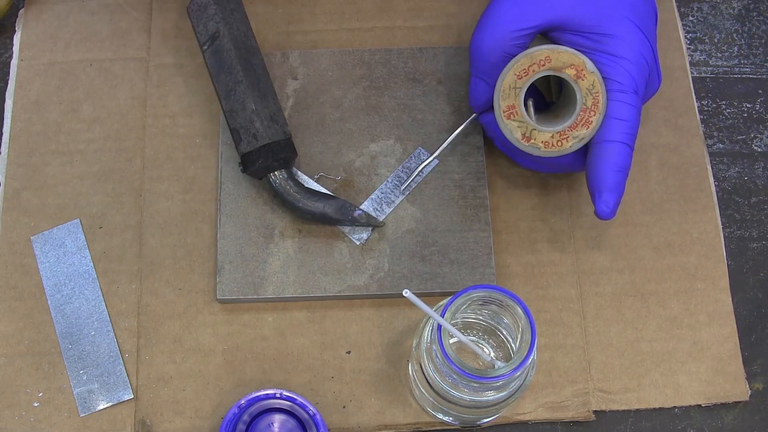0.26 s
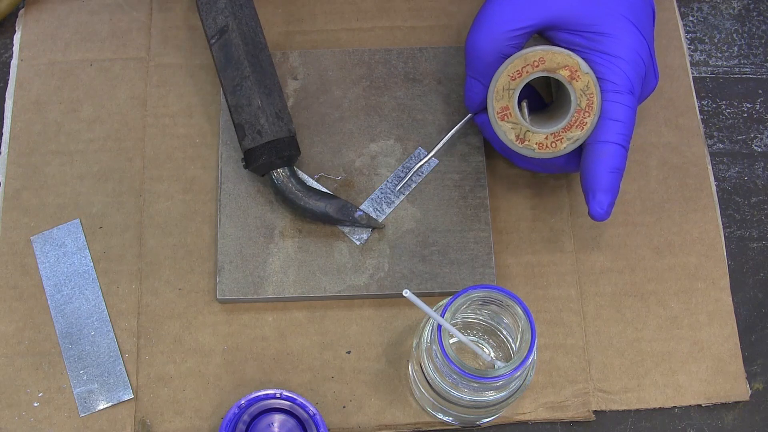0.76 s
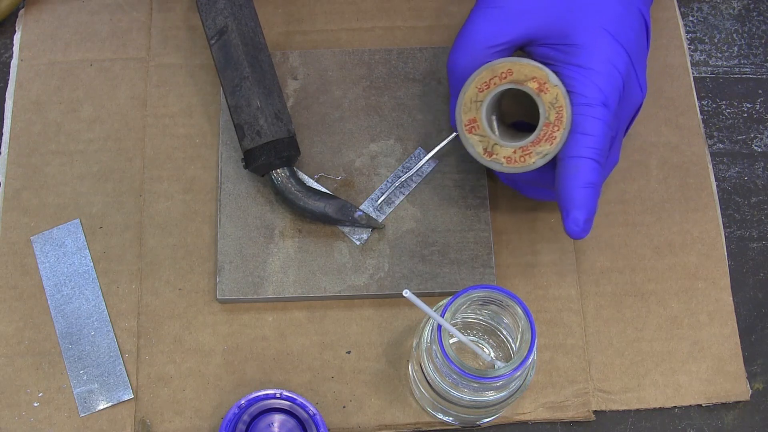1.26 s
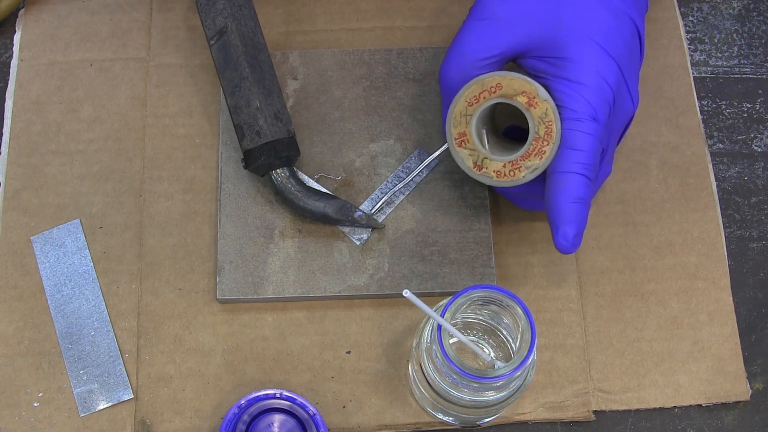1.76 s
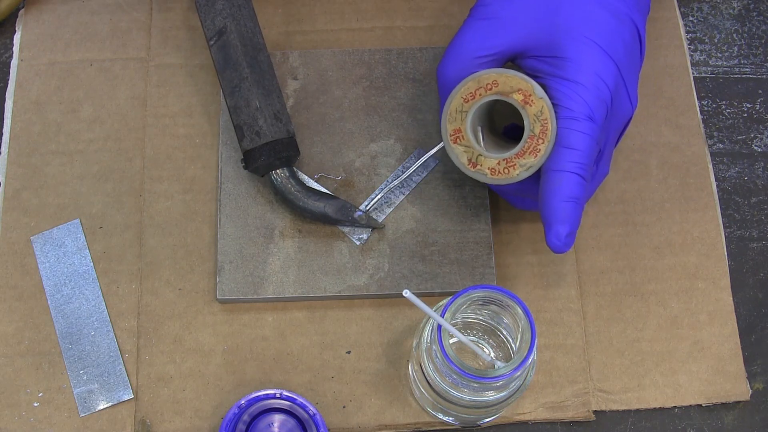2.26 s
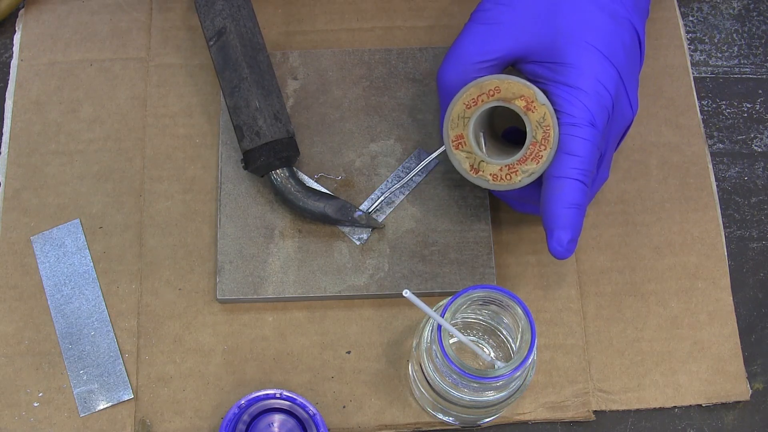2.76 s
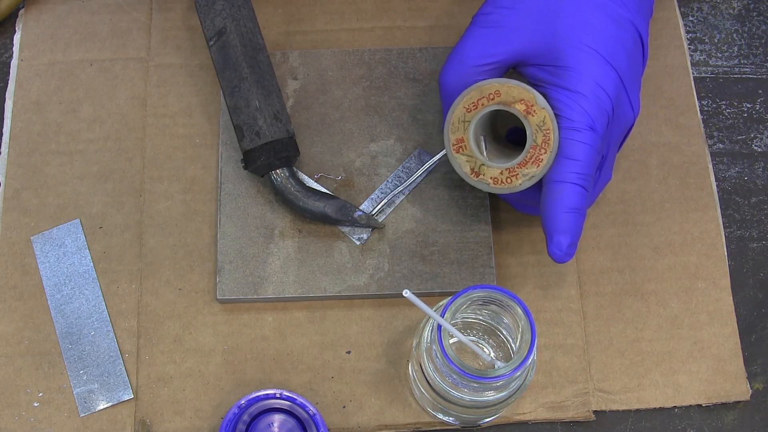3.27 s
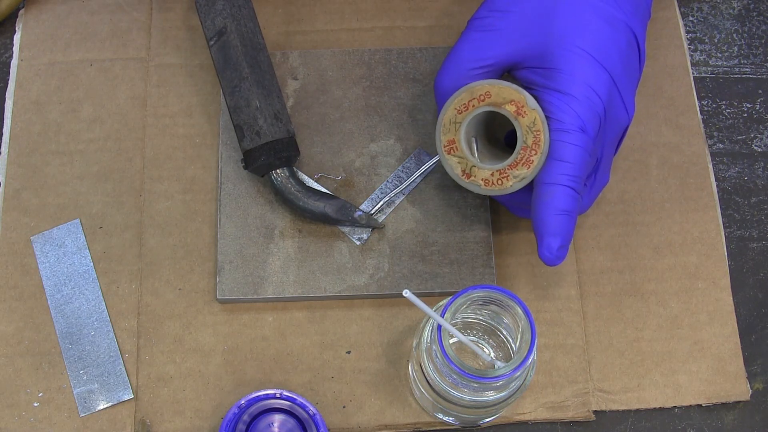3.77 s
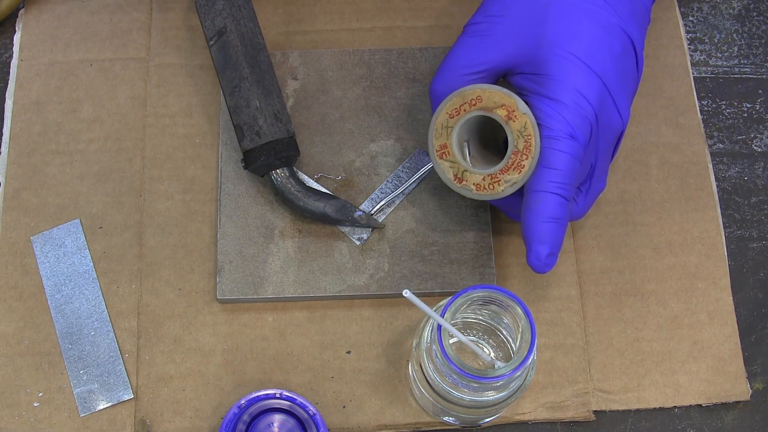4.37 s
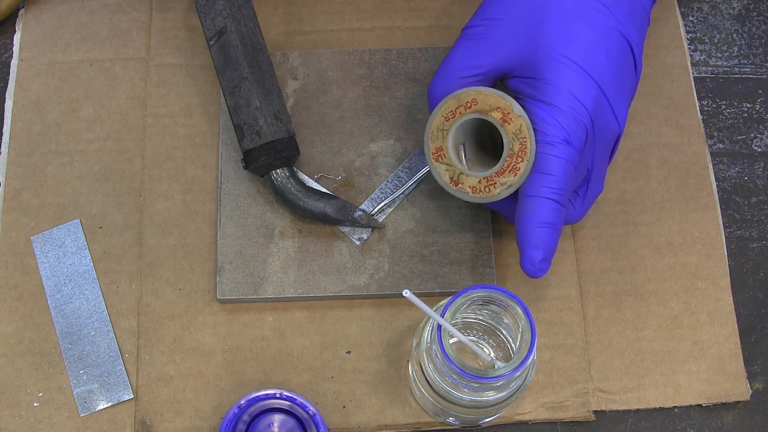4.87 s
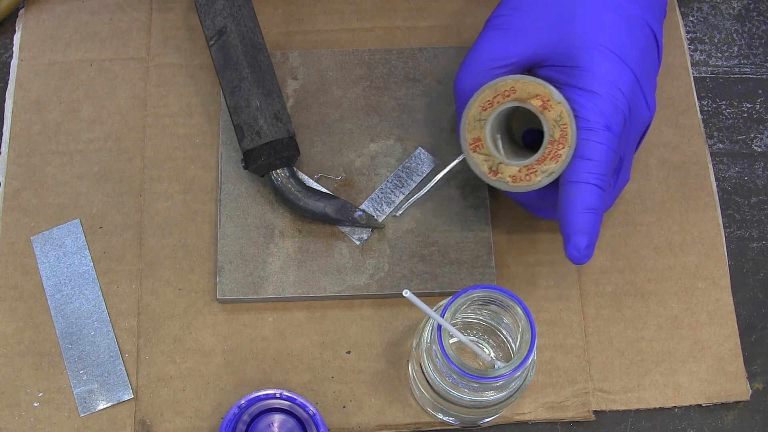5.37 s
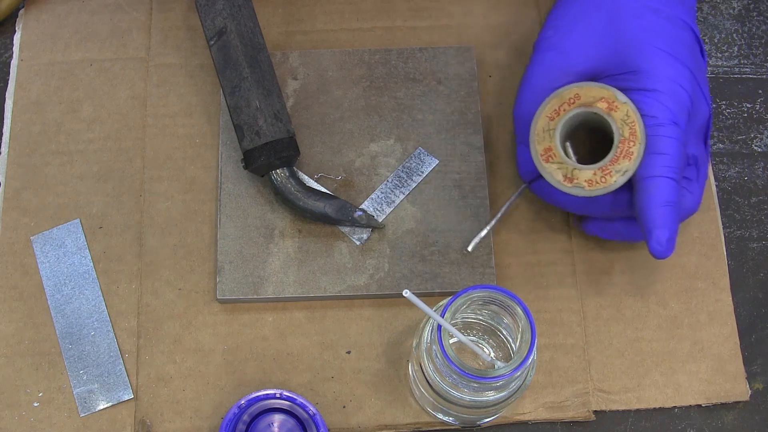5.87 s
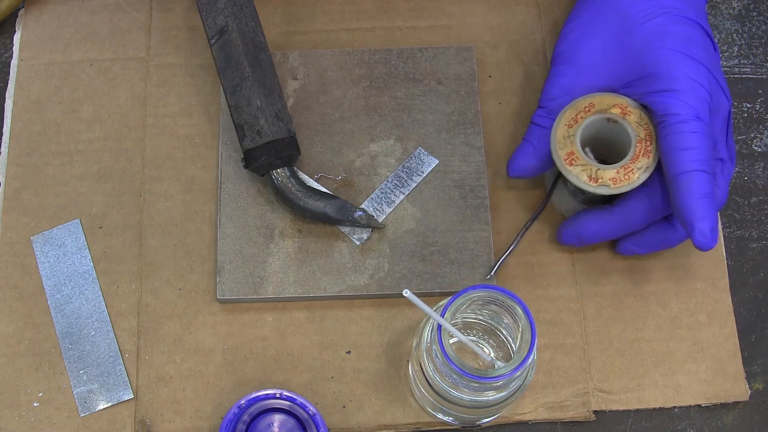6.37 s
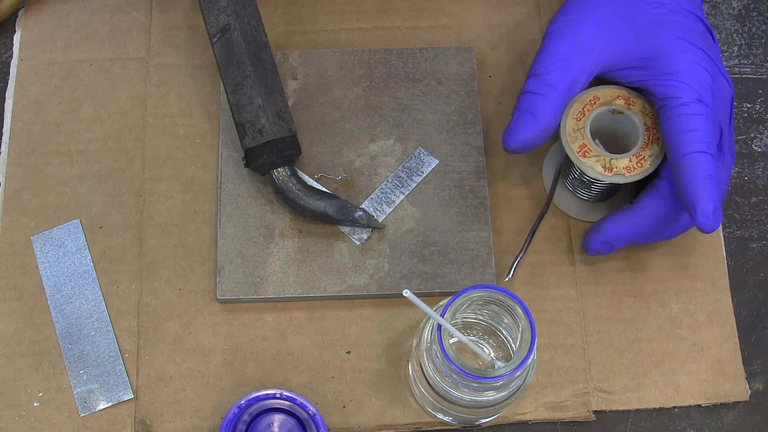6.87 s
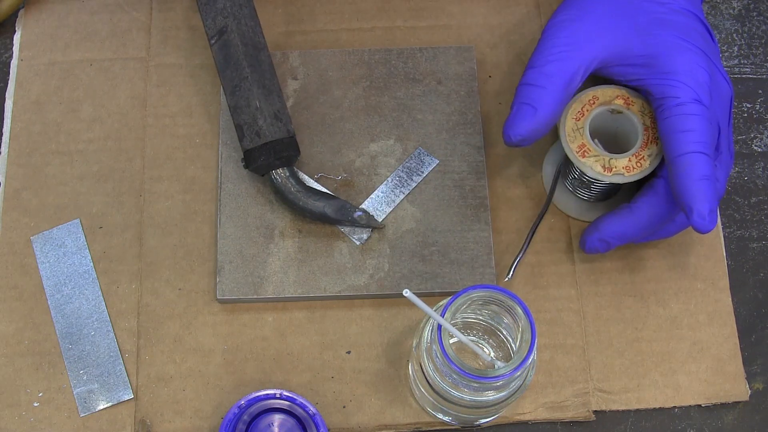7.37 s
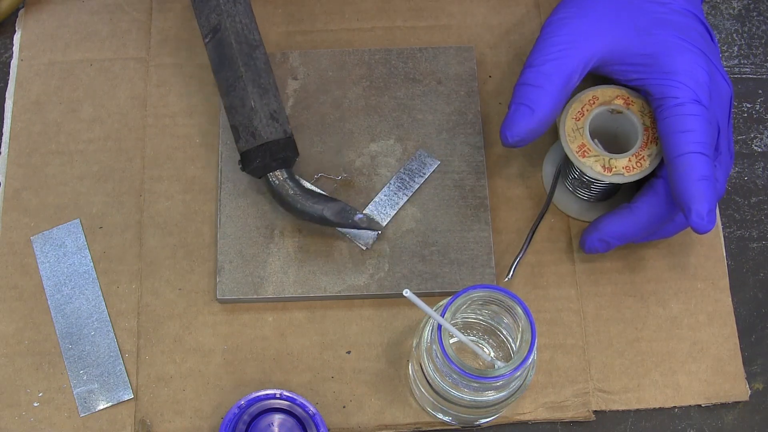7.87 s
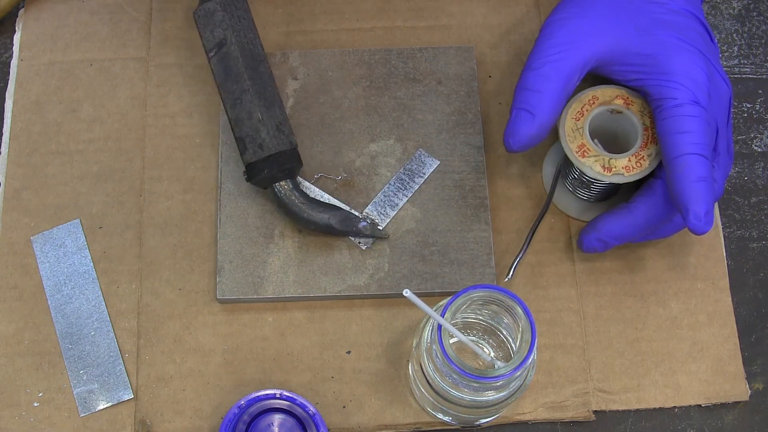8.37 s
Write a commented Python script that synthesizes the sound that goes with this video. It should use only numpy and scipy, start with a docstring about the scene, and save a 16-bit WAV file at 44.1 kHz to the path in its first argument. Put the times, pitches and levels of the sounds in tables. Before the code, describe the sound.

A hot soldering iron boils flux on a strip of sheet metal, making a fine, fluttering sizzle close to the microphone. It grows more crackly, with spits and hissing flares, while a gloved hand puts a spool aside with light taps and faint rubbery squeaks. The sizzle dies, the iron scrapes and clinks briefly, and a last drop bursts with a sharp pop. Faint ventilation runs throughout in the workshop.

```python
"""A fine, fluttering sizzle: a hot soldering iron boils acid flux on a strip of sheet metal, and thousands
of tiny steam bubbles burst, with flares and spits where fresh flux meets the tip. A gloved hand puts the
solder spool aside with light taps, rubs and squeaks. The film dries and the sizzle dies; the iron scrapes
and clinks as it is shifted. A last wet spot flashes off with a pop that the workshop's walls answer,
over steady ventilation."""
import sys
import numpy as np
from scipy import signal
from scipy.fft import rfft, irfft, next_fast_len
from scipy.io import wavfile
from scipy.ndimage import map_coordinates

SR = 44100
rng = np.random.default_rng(int(sys.argv[2]) if len(sys.argv) > 2 else 0)


def to_wav(sig):
    """Store sig (one row per channel, or 1-D mono) as 16-bit WAV at the path in sys.argv[1].

    Samples outside -1..1 are clipped; the rate is SR.
    """
    pcm = np.clip(np.atleast_2d(sig), -1, 1) * 32767
    pcm = np.round(pcm).astype(np.int16)
    wavfile.write(sys.argv[1], SR, pcm.T)  # frames by channels


N = 379701
DRY_S, POP_S = 7.34, 8.408  # film used up; trapped drop bursts


def amp(db):
    return 10 ** (np.asarray(db) / 20)


def unit_rms(x):
    return x / np.sqrt(np.mean(x ** 2) + 1e-20)


def along(points, hz):
    """Interpolate (f/Hz, value) points on a log axis."""
    freqs, values = np.transpose(points)
    return np.interp(np.log(hz + 1), np.log(freqs + 1), values)


def clock():
    return np.arange(N) / SR


def swell(crest_s, half_s):
    """Bell-shaped envelope."""
    return np.exp(-((clock() - crest_s) / half_s) ** 2)


def wobble(knots_per_s):
    """Smooth random curve."""
    knots = rng.standard_normal(int(N * knots_per_s / SR) + 4)
    return map_coordinates(knots, [clock() * knots_per_s])


def filtered(x, gain_at_hz):
    """Zero-phase filter."""
    size = next_fast_len(N + SR // 2)
    return irfft(rfft(x, size) * gain_at_hz(np.fft.rfftfreq(size, 1 / SR)), size)[..., :N]


def snap(spectrum, size=2048):
    """Minimum-phase pulse with this spectrum, energy 1."""
    cepstrum = irfft(np.log(amp(along(spectrum, np.fft.rfftfreq(size, 1 / SR)))))
    cepstrum[1:size // 2] *= 2
    cepstrum[size // 2 + 1:] = 0
    pulse = irfft(np.exp(rfft(cepstrum)))
    return pulse / np.linalg.norm(pulse)


def through(x, pulse):
    return signal.fftconvolve(x, pulse)[:N]


def add(track, start_s, sound):
    rest = track[round(start_s * SR):]
    rest[:len(sound)] += sound[:len(rest)]


def impulses(per_s, spread_db):
    """Random impulses of uneven size, rms 1."""
    happens = rng.random(N) < per_s / SR
    sizes = amp(spread_db * np.clip(rng.standard_normal(N), -2, 2))
    return unit_rms(happens * sizes * rng.choice([-1, 1], N))


def bubbles(spectrum, per_s, spread_db, ring_db, bands=7):
    """Bursting bubbles: bare snaps, plus as many that ring briefly at a pitch set by their size."""
    ringing = np.zeros(N)
    for hz in np.geomspace(3000, 13000, bands):
        resonance = signal.iirpeak(hz, Q=2, fs=SR)
        ringing += signal.lfilter(*resonance, impulses(per_s / bands, spread_db)) / np.sqrt(hz)
    bursts = impulses(per_s, spread_db) + amp(ring_db) * unit_rms(ringing)
    return unit_rms(through(bursts, snap(spectrum)))


AIR_SPECTRUM = [(55, -10), (95, -6), (150, -0.5), (300, -0.5), (400, -1), (490, -0.5), (600, -1.5),
                (800, -0.5), (1200, -5.5), (2200, -8.5), (3800, -10.5), (7000, -17.5), (10000, -19),
                (15800, -26.5)]  # room air: f/Hz, level/dB
AIR_COHERENCE = [(30, 1), (90, 0.23), (250, 0.017), (700, 0.04), (2000, 0.47), (6000, 0.98)]  # f/Hz, left-right correlation

def ventilation():
    """Steady stereo noise of moving air."""
    def mid_side_gains(hz):
        angle = np.arccos(np.clip(along(AIR_COHERENCE, hz), -1, 1)) / 2
        return amp(along(AIR_SPECTRUM, hz)) * [np.cos(angle), np.sin(angle)]
    mid, side = filtered(rng.standard_normal((2, N)), mid_side_gains)
    return amp(-61) * unit_rms(np.array([mid + side, mid - side]))


ROOM_DECAY = [(150, 0.57), (1000, 0.34), (4000, 0.35), (12000, 0.24)]  # reverberation: f/Hz, t60/s
ROOM_WIDTH = [(150, 0.33), (400, 0.23), (1000, 0.27), (3000, 0.02), (8000, 0.02)]  # f/Hz, side-to-mid ratio

def workshop(x):
    """Wall reverberation: the bass lasts longest and spreads widest."""
    hz, t, noise = signal.stft(rng.standard_normal((2, SR // 2)), SR, nperseg=256)
    decay = amp(-60 * t / along(ROOM_DECAY, hz)[:, None])
    _, tails = signal.istft(noise * decay, SR, nperseg=256)
    delayed = np.pad(x, (round(0.005 * SR), 0))
    mid, side = [through(delayed, tail / np.linalg.norm(tail)) for tail in tails]
    side = filtered(side, lambda hz: along(ROOM_WIDTH, hz))
    return np.array([mid + side, mid - side])


BENCH_JOLTS = [(2.97, -60, -82), (3.05, -64, -84), (3.127, -59, -82), (7.784, -73, -64), (7.83, -70, -66),
               (8.285, -58, -60), (8.409, -53, -63)]  # t/s, rumble/dB, boom/dB
RUMBLE_SPECTRUM = [(50, -32), (100, -21), (160, 1), (260, -5), (450, -4), (1500, -38), (6000, -78)]  # f/Hz, level/dB

def bench(boom_hz=96, boom_t60_s=0.22, rumble_t60_s=0.2):
    """Each jolt makes the bench rumble and boom in its lowest mode."""
    power, boom = np.zeros(N), np.zeros(N)
    for s, rumble_db, boom_db in BENCH_JOLTS:
        t = np.maximum(clock() - s, 0)
        attack = 1 - np.exp(-t / 0.0026)
        power += (amp(rumble_db - 60 * t / rumble_t60_s) * attack) ** 2
        boom += amp(boom_db - 60 * t / boom_t60_s) * attack * np.sin(2 * np.pi * boom_hz * t)
    rumble = unit_rms(through(rng.standard_normal(N), snap(RUMBLE_SPECTRUM)))
    return boom + np.sqrt(power) * rumble


RIM_BRUSHES = [(6.2, -61, 0.045), (6.23, -57, .004), (6.3, -66, 0.036), (7.243, -66.5, 0.16)]  # crest t/s, level/dB, half-length/s
CARDBOARD_SPECTRUM = [(60, -14), (130, -5), (250, -10), (390, -8), (480, 1.5), (600, -5), (1300, -12),
                      (3000, -25), (15800, -54)]  # f/Hz, level/dB

def cardboard():
    """The spool's rim brushes cardboard, which answers with a soft, hollow tone."""
    fibres = unit_rms(through(impulses(per_s=5600, spread_db=1.5), snap(CARDBOARD_SPECTRUM)))
    return fibres * sum(amp(db) * swell(s, half_s) for s, db, half_s in RIM_BRUSHES)


GLOVE_STROKES = [(5.861, -52, 0.031, 2700), (5.965, -48.5, 0.074, 3364), (6.45, -61, 0.074, 1596)]  # crest t/s, level/dB, half-length/s, centre f/Hz
GLOVE_SQUEAKS = [(6.41, -57, 0.028, 2010), (6.42, -59, .03, 1580), (6.502, -61, 0.049, 2000),
                 (6.51, -63, .045, 1570)]  # crest t/s, level/dB, half-length/s, f/Hz

def glove(rise_hz_per_s=4000, sag_per_s=0.5):
    """Rubber slips on the spool: rubs rise as the grip tightens, squeaks sink as the rubber slows."""
    slips = filtered(impulses(per_s=2500, spread_db=3), lambda hz: 1 / (1 + (hz / 620) ** 3))
    track, t = np.zeros(N), clock()
    for s, db, half_s, hz in GLOVE_STROKES:
        cycles = hz * t + rise_hz_per_s * (t - s) ** 2 / 2
        track += amp(db) * swell(s, half_s) * unit_rms(slips * np.cos(2 * np.pi * cycles))
    for s, db, half_s, hz in GLOVE_SQUEAKS:
        pitch_hz = hz * (1 - sag_per_s * (t - s) + 0.014 * wobble(35) + 0.0228 * wobble(400))
        envelope = amp(db + 2.6 * wobble(150)) * swell(s, half_s)
        track += envelope * np.sin(2 * np.pi * np.cumsum(pitch_hz) / SR)
    return track


SPOOL_TAPS = [(3.1277, -41, 2270, 0.05, -32), (3.133, -50, 2180, .03, -33), (3.548, -52, 2050, .01, -39),
              (3.558, -43, 2080, 0.013, -28), (6.112, -32.5, 2590, 0.035, -31),
              (7.589, -54, 860, 0.035, -58)]  # t/s, note/dB, f/Hz, t60/s, click/dB
CLICK_SPECTRUM = [(100, -27), (400, -10), (900, 5.5), (3000, 5.5), (4100, 4), (6500, 2), (10000, -6),
                  (15800, -31)]  # f/Hz, level/dB

def spool(rattle_t60_s=0.029):
    """Spool and wire tap as they are handled: a click, a brief rattle and one short note."""
    track, t, pulse = np.zeros(N), np.arange(SR // 8) / SR, snap(CLICK_SPECTRUM)
    for s, note_db, hz, t60, click_db in SPOOL_TAPS:
        attack = 1 - np.exp(-t / 0.0004)
        note = amp(note_db - 60 * t / t60) * attack * np.sin(2 * np.pi * hz * t)
        rattle = amp(-25 - 60 * t / rattle_t60_s) * rng.standard_normal(len(t))
        rattle[0] = 1  # first contact
        click = signal.fftconvolve(rattle, pulse)[:len(t)] / np.abs(pulse).max()
        add(track, s, note + amp(click_db) * click)
    return track


STRIP_TWITCHES = [(4.836, -41), (5.3454, -37.5)]  # t/s, level/dB
STRIP_MODES = [(1690, -11, 0.088), (2740, -7.5, 0.064), (3430, -6, 0.06), (5170, -1, 0.062),
               (6760, -6, .04)]  # f/Hz, level/dB, t60/s

def strip():
    """The metal strip twitches on the bench and rings briefly."""
    track, t = np.zeros(N), np.arange(SR // 8) / SR
    for s, db in STRIP_TWITCHES:
        for hz, mode_db, t60 in STRIP_MODES:
            level_db = db + mode_db + rng.normal(0, 1.5)
            add(track, s, amp(level_db - 60 * t / t60) * np.sin(2 * np.pi * hz * t))
    return track


IRON_MODES = [(2195, -10, 0.05), (2580, -7.5, 0.045), (4210, -17, .04), (6450, -13, 0.05),
              (7487, -8, 0.048), (7690, -8, .025), (8050, -7, .025), (8275, -10, .022), (12075, -6.5, 0.04),
              (13200, -14, .022)]  # f/Hz, level/dB, t60/s

def iron_ring(t, tilt_db_per_oct, detune=0.0022):
    """Each contact loads the tip differently and scatters its modes; a hard one favours the high ones."""
    ring = np.zeros(len(t))
    for hz, db, t60 in IRON_MODES:
        level_db = db + tilt_db_per_oct * np.log2(hz / 4500) + rng.normal(0, 1.9)
        pitch_hz = hz * (1 + detune * rng.standard_normal())
        ring += amp(level_db - 60 * t / t60) * np.sin(2 * np.pi * (pitch_hz * t + rng.random()))
    return ring


IRON_KNOCKS = [(7.7834, -38, 0.2), (7.8174, -44, -6), (7.8285, -40.5, 2.5), (7.836, -38, -0.5),
               (7.8486, -42, 2.5), (7.855, -47, 1), (7.866, -42.5, 2.5), (7.882, -51, -1), (7.895, -51, 0)]  # t/s, level/dB, tilt/(dB/oct)
STEEL_SPECTRUM = [(100, -22), (900, -4), (2300, -2), (3300, -1), (4300, 0.5), (5600, -2.5), (8000, 4.5),
                  (12500, 0), (14000, -6), (15800, -22)]  # steel on steel: f/Hz, level/dB

def iron_clinks(crack_t60_s=0.0092):
    """The iron chatters on the metal: a thin crack and a ring per contact."""
    track, t = np.zeros(N), np.arange(SR // 4) / SR
    for s, db, tilt in IRON_KNOCKS:
        noise = amp(5.5 + tilt - 60 * t / crack_t60_s) * rng.standard_normal(len(t))
        crack = signal.fftconvolve(noise, snap(STEEL_SPECTRUM))[:len(t)]
        add(track, s, amp(db) * (iron_ring(t, tilt) + crack))
    return track


PRESSED_TIP_MODES = [(2500, 0), (6470, -19), (7650, -2), (8100, 3), (12100, -8)]  # f/Hz, level/dB

def iron_scrape(lift_s=7.738, rise_db_per_s=148, fall_db_per_s=900, t60_s=0.011):
    """The tip drags ever harder, then lifts; tiny slips excite its damped modes."""
    t, since_lift = np.arange(SR // 4) / SR, clock() - lift_s
    drag_db = -57 - np.maximum(-rise_db_per_s * since_lift, fall_db_per_s * since_lift)
    slips = impulses(per_s=4000, spread_db=4)
    ring = sum(amp(db - 60 * t / t60_s) * np.sin(2 * np.pi * hz * t) for hz, db in PRESSED_TIP_MODES)
    grit = amp(-10) * through(slips, snap(STEEL_SPECTRUM))
    return amp(drag_db) * (unit_rms(through(slips, ring)) + grit)


POP_SPECTRUM = [(60, -40), (100, -15), (160, -6.5), (250, -2), (400, -1.5), (950, 2.5), (1400, 3.5),
                (2100, -12.5), (2900, -5.5), (4000, -19), (6000, -21), (10000, -19), (15800, -38)]  # f/Hz, level/dB
WALL_ECHOES = [(.0245, -22), (.041, -16), (.072, -25)]  # delay/s, level/dB

def steam_pop(shudder_t60_s=0.042, echo_t60_s=0.03, echo_cut_hz=1600):
    """A trapped drop explodes under the tip; the bench shudders and near walls return a dulled crack."""
    track, t, pulse = np.zeros(N), np.arange(SR // 4) / SR, snap(POP_SPECTRUM)
    shudder = amp(-29.5 - 60 * t / shudder_t60_s) * rng.standard_normal(len(t))
    add(track, POP_S, -amp(0.5) * pulse)
    add(track, POP_S + 0.00037, amp(-6.5) * snap(CRACKLE_SPECTRUM))
    add(track, POP_S + 0.00097, amp(-2.5) * signal.fftconvolve(shudder, pulse))
    dulled = signal.lfilter(*signal.butter(2, echo_cut_hz, fs=SR), pulse)
    for delay_s, db in WALL_ECHOES:
        scatter = amp(-60 * t / echo_t60_s) * rng.standard_normal(len(t))
        echo = signal.fftconvolve(scatter / np.linalg.norm(scatter), dulled)
        add(track, POP_S + delay_s, amp(db) * echo)
    return track


POOL_SURGES = [(0.46, -55.5, 0.17, -2), (0.718, -61.5, 0.14, 2), (1.005, -53, 0.16, 0.5),
               (3.84, -62.5, 0.28, -3), (5.338, -54, 0.037, -2.5), (6.205, -55, 0.072, -0.5),
               (6.465, -56.5, 0.021, -5), (8.398, -48, .007, -3)]  # crest t/s, level/dB, half-length/s, tilt/(dB/oct)
FROTH_SPECTRUM = [(120, -19), (300, -11), (650, -8), (1000, -3), (1300, -0.5), (1600, -4), (2350, -4),
                  (2850, -0.5), (3400, -5), (4200, -2), (6000, -24), (15800, -47)]  # f/Hz, level/dB

def surges():
    """The flux pool wells up in soft swells of large bubbles, deeper than the fizz."""
    track = np.zeros(N)
    froth = through(impulses(per_s=6000, spread_db=5.5), snap(FROTH_SPECTRUM))
    for s, db, half_s, tilt in POOL_SURGES:
        tilted = filtered(froth, lambda hz: amp(tilt * np.log2(np.maximum(hz, 200) / 1000)))
        track += amp(db) * swell(s, half_s) * unit_rms(tilted)
    return track


STEAM_FLARES = [(0.34, 0.055, -53), (2.552, 0.013, -46), (3.162, 0.0042, -50), (4.369, 0.012, -40),
                (4.833, 0.011, -40), (4.852, 0.01, -42.5), (5.282, 0.023, -45), (5.325, 0.036, -43.5),
                (5.56, 0.091, -48), (6.091, 0.026, -48.5), (6.145, 0.033, -42), (6.174, 0.039, -42.5),
                (6.431, 0.062, -40), (6.9, 0.038, -47.5), (7.026, 0.042, -46.5), (7.239, 0.027, -50.5),
                (7.34, 0.011, -56), (7.416, 0.017, -48.5), (7.468, 0.061, -67), (8.269, 0.012, -51),
                (8.281, 0.012, -33.5), (8.374, 0.019, -40.5), (8.441, 0.034, -43.5), (8.53, .1, -62)]  # start t/s, length/s, level/dB
FLARE_SPECTRUM = [(60, -51), (600, -17), (1300, -7.5), (1750, -3.5), (2350, -7.5), (2700, -2), (3400, -1),
                  (4000, -5), (5200, 0), (6700, 2.5), (8800, -1), (10200, 0), (12500, -5.5), (15800, -19)]  # a flare ringing the strip: f/Hz, level/dB

def flares(rise_share=0.21, fall_share=0.78, hiss_rise_s=0.009, hiss_fall_s=0.0018):
    """Fresh flux flashes to steam in rushes of coarse bubbles; one more hiss leads into the pop."""
    since_pop = clock() - POP_S
    hiss = amp(-32) * np.exp(-np.maximum(-since_pop / hiss_rise_s, since_pop / hiss_fall_s))
    power = hiss ** 2
    for s, length_s, db in STEAM_FLARES:
        t = np.maximum(clock() - s, 0)
        attack = 1 - np.exp(-t / (rise_share * length_s))
        release = np.exp(-np.maximum(t - length_s, 0) / (fall_share * length_s))
        power += (amp(db) * attack * release) ** 2
    return np.sqrt(power) * bubbles(FLARE_SPECTRUM, per_s=5000, spread_db=6.5, ring_db=-14.5)


BIG_SPITS = [(2.138, -26), (3.1635, -21.5), (4.3772, -36), (4.3802, -27), (4.3864, -20.5), (4.92, -38),
             (4.979, -25), (5.305, -23), (5.3265, -23), (5.345, -22), (5.359, -21), (5.742, -28),
             (6.44, -21), (6.4448, -22), (6.4686, -25), (6.768, -22.5), (6.776, -30), (6.803, -22.5),
             (6.949, -29), (7.095, -26), (7.2575, -30), (7.426, -34), (7.45, -35), (8.448, -32),
             (8.451, -27)]  # t/s, peak/dB
SPIT_SPECTRUM = [(60, -38), (600, -19.5), (1700, -7.5), (3000, -4), (4100, -6), (5600, 1.5), (7200, 3),
                 (10200, -3), (12500, -4.5), (15800, -18)]  # f/Hz, level/dB

def spits(stray_count=34, thin_from_s=4.88, spray_t60_s=0.019):
    """Big bubbles snap and spray droplets; lesser strays come thickest as the film first runs thin."""
    track, t, pulse = np.zeros(N), np.arange(SR // 50) / SR, snap(SPIT_SPECTRUM)
    strays = [(thin_from_s + when ** 3 * (DRY_S - thin_from_s), -32.5 + 2.5 * (2 * size - 1))
              for when, size in rng.random((stray_count, 2))]
    for s, db in list(BIG_SPITS) + strays:
        spray = amp(-28 - 60 * t / spray_t60_s) * rng.standard_normal(len(t))
        spray[0] = 1  # the burst itself
        add(track, s, amp(db) * signal.fftconvolve(spray, pulse) / np.abs(pulse).max())
    return track


BOIL_STRENGTH = [(0.0, -50.5), (0.39, -48), (0.8, -50.5), (1.18, -50.5), (1.35, -47.5), (1.7, -49.5),
                 (2.03, -47.5), (2.4, -43.5), (3.01, -47), (3.86, -48), (4.35, -45), (4.72, -48),
                 (5.22, -52.5), (5.33, -47.5), (5.51, -47), (5.75, -52.5), (5.94, -53), (6.49, -55.5),
                 (6.63, -46), (7.12, -50.5), (7.22, -50.5), (7.3, -53.5), (7.35, -54.5)]  # t/s, relative level/dB
FIZZ_SPECTRUM = [(150, -48), (600, -22), (1200, -8), (2100, -5.5), (2420, -10.5), (2800, -3.5), (3700, -6),
                 (4050, -6), (4750, -2), (7300, 2), (9000, -3), (11000, -5), (13500, -8), (15800, -19)]  # small bubbles: f/Hz, level/dB
CRACKLE_SPECTRUM = [(60, -30), (600, -18), (1600, -7), (2350, -4), (3000, -6.5), (4100, -6.5), (5600, -1.5),
                    (7200, 3.5), (8800, 0), (10200, -4.5), (12500, -4), (15800, -19)]  # large bubbles: f/Hz, level/dB
SHRILL_SPECTRUM = [(1000, -44), (6000, -23), (8800, -10), (10200, -4.5), (11400, -7), (12400, -11),
                   (13100, -12), (15800, -24)]  # tiny bubbles: f/Hz, level/dB

def sizzle(dry_out_db_per_s=274):
    """Boiling flux fizzes; as the film dries, large and tiny bubbles gain on the fizz, then all dies."""
    t = clock()
    boil_db = np.interp(t, *np.transpose(BOIL_STRENGTH))
    dryness = np.minimum(t / DRY_S, 1)
    crackle_db = -62.5 + 8.5 * dryness ** 2 + 0.52 * (boil_db - boil_db.mean()) + 1.4 * wobble(30)
    flutter_db = 0.66 * wobble(25.02) + 0.66 * wobble(180)
    fizz = amp(flutter_db) * bubbles(FIZZ_SPECTRUM, per_s=18000, spread_db=3, ring_db=-4)
    crackle = amp(crackle_db) * bubbles(CRACKLE_SPECTRUM, per_s=660, spread_db=10.5, ring_db=-2)
    shrill_db = -19.5 + 15.5 * dryness + 1.9 * wobble(22)  # relative to the fizz
    shrill = amp(shrill_db) * bubbles(SHRILL_SPECTRUM, per_s=4000, spread_db=3, ring_db=15)
    dry_out = amp(-dry_out_db_per_s * np.maximum(t - DRY_S, 0))
    return dry_out * (amp(boil_db - 0.72) * (fizz + shrill) + crackle)


def scene():
    """Bench sounds close and centred; reverberation and ventilation in stereo."""
    flux = sizzle() + surges() + flares() + spits()
    near = flux + iron_clinks() + iron_scrape() + spool() + cardboard() + glove() + strip() + bench()
    pop = steam_pop()
    return near + pop + amp(-12.5) * workshop(near) + amp(-11.5) * workshop(pop) + ventilation()


HOUSING_RESPONSE = [(2200, 0), (2420, -1), (2800, 0.9), (3400, -0.5), (3600, -1), (3750, 3), (4000, -3),
                    (4250, 1), (4600, 1), (5200, 0)]  # resonances and notches: f/Hz, gain/dB

def record(dry, low_cut_hz=65, top_hz=15800):
    """The microphone sheds deep bass, its housing colours the sound, and the top is band-limited."""
    lean = signal.lfilter(*signal.butter(2, low_cut_hz, "high", fs=SR), dry)
    return filtered(lean, lambda hz: amp(along(HOUSING_RESPONSE, hz)) * (hz < top_hz))


dry = scene()
out = record(dry)
to_wav(out)
```